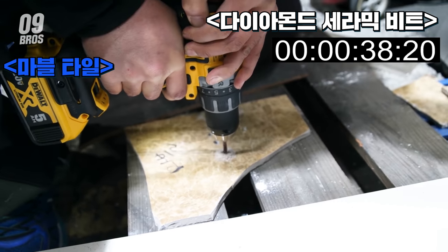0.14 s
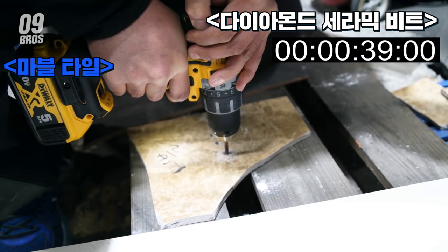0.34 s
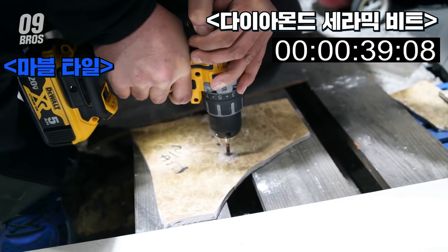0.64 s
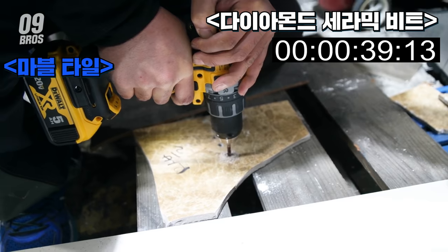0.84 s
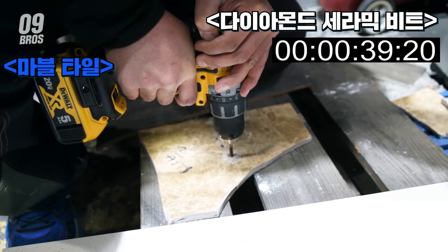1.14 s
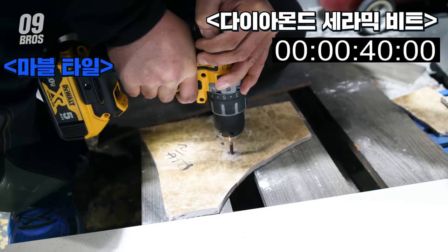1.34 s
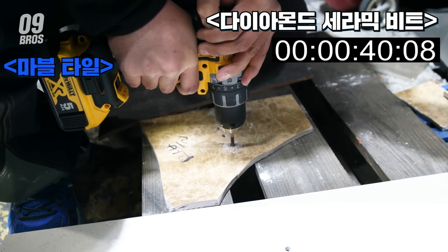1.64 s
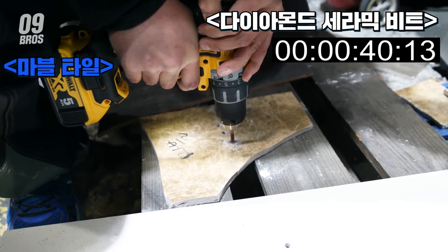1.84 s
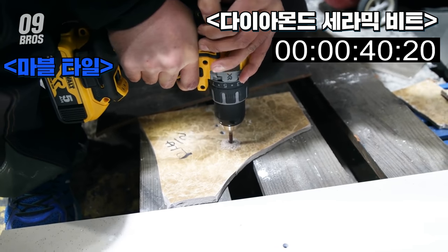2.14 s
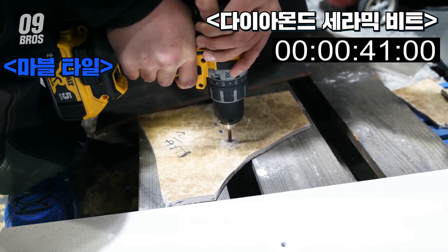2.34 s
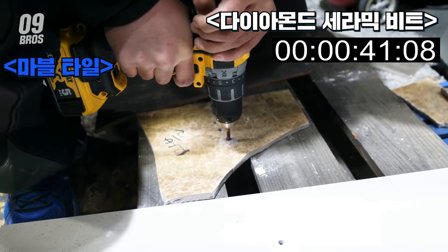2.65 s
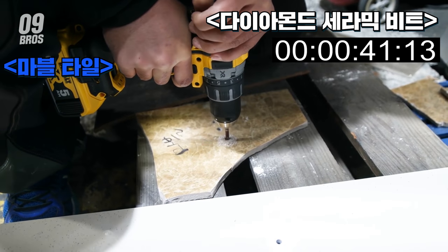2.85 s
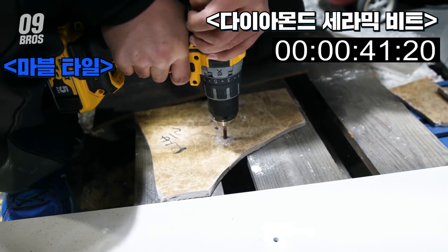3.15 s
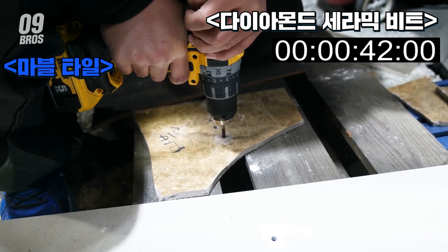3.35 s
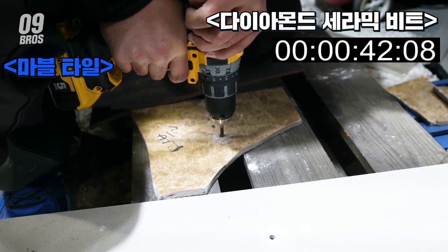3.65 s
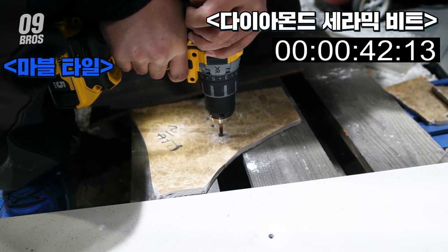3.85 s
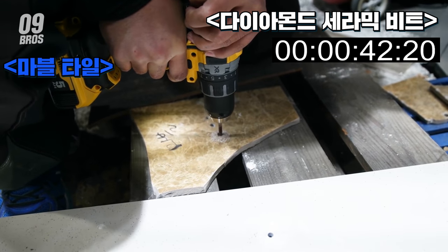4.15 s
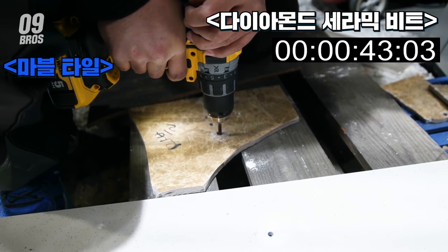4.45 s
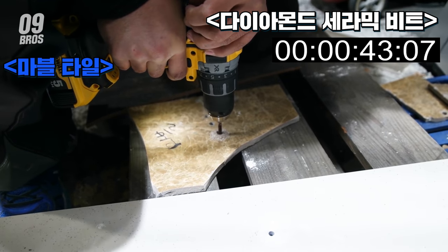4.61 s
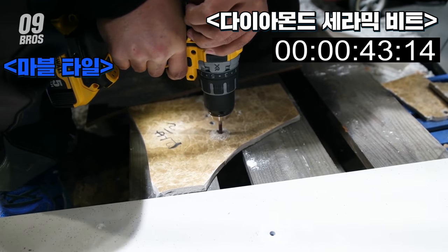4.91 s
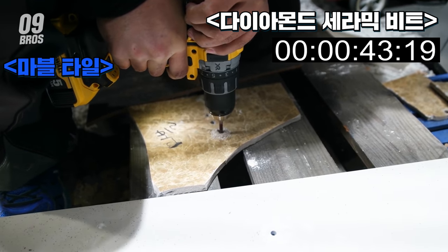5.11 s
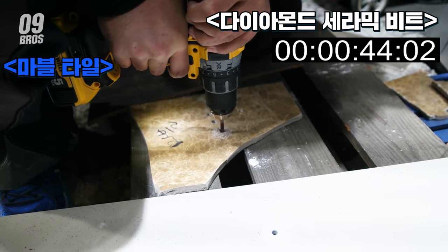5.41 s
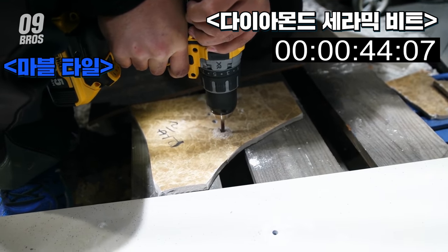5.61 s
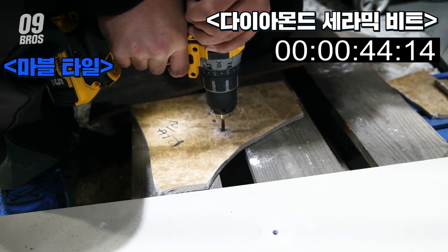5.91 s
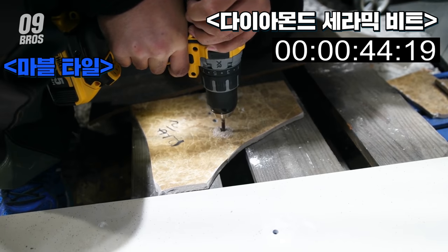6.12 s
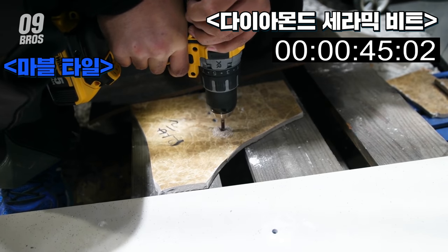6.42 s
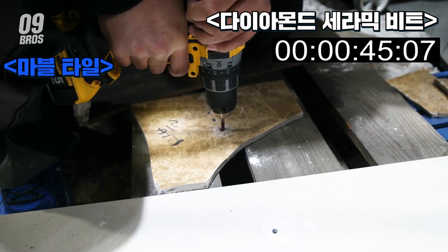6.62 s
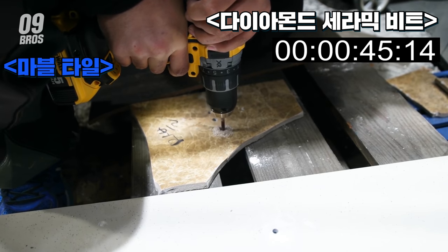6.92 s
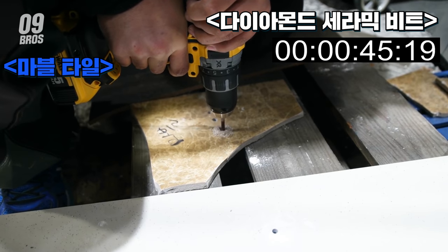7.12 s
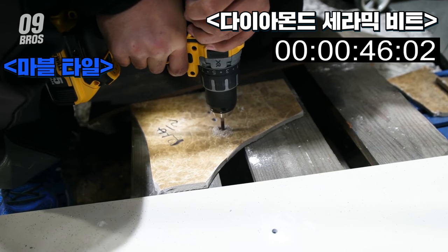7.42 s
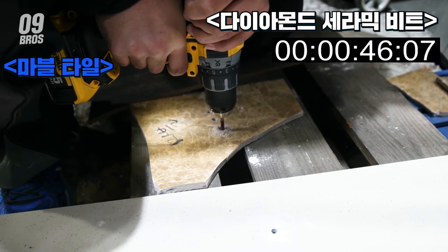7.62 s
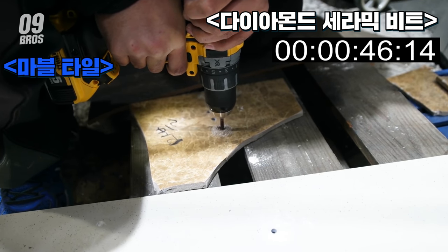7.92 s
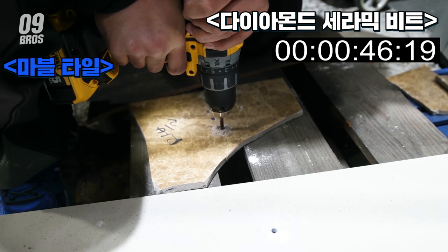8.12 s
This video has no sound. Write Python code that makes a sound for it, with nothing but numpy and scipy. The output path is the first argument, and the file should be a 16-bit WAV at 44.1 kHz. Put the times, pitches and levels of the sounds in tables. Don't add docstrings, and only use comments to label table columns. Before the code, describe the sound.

Close, constant drilling into hard tile: singing motor, harsh sandy hiss and faint bit rattle, interrupted by low wind-like buffets on the microphone.

```python
import sys
import numpy as np
from scipy import signal
from scipy.fft import rfft, irfft, next_fast_len
from scipy.io import wavfile
from scipy.ndimage import uniform_filter1d, map_coordinates

SR = 44100
rng = np.random.default_rng(int(sys.argv[2]) if len(sys.argv) > 2 else 0)


def master_out(mix):
    frames = np.transpose(np.atleast_2d(mix))
    ceiling = np.clip(frames, -1, 1)
    pcm = np.round(ceiling * 32767).astype(np.int16)
    wavfile.write(sys.argv[1], SR, pcm)


def to_linear_factor(level_db):
    exponent = np.asarray(level_db, float) / 20
    return 10 ** exponent


N = 364442

# start_s, shaft_hz, rocking_depth_hz
SHAFT_SPEED = [(0, 410.3, 1.5), (1.5, 410.4, 1.35), (2.6, 410.7, 1.35), (3.3, 410.4, 1.65),
               (3.9, 410.3, 2.15), (4.7, 410.5, 2.15), (5.3, 410.1, 1.5), (6.3, 410.2, 1.45),
               (7.5, 410.4, 1.6), (8.264, 410.1, 1.7)]
SHAFT_TURNS_PER_CHUCK_TURN, CHUCK_START_TURNS = 41.97, -.22
SHAFT_TURNS_PER_WHIRL, WHIRL_START_RAD = 43.15, .85
PLANET_PASSES_PER_SHAFT_TURN = .589
# start_s, second_grip_share, vent_lean_to_microphone, bit_pressure_db
GRIP = [(0, 0.26, 0.27, -0.5), (1, 0, 0.17, 0), (1.8, 0.02, 0.05, 0), (2.08, 0.03, 0.3, 0),
        (2.5, 0.15, 0.97, 0), (2.65, .4, 0.96, -0.5), (2.87, 1, 1, -3.5), (3.1, 0.66, 0.46, -1),
        (3.35, 0.81, 0.14, 0.1), (4.2, 1, 0.14, 0.1), (5, 1, 0, 0), (5.6, .9, 0.13, 0.2),
        (7, 0.93, 0.04, -0.1), (8.264, 0.88, 0.06, 0.2)]
# first_grip_db, second_grip_db, full_lean_gain_db
UNBALANCE_DB, THIRD_DB, POLES_DB = (-9, -3.5, -9.5), (-16, -17.5, 0.5), (-14.5, -21, 8.5)
PINION_DB, SLOTS_DB = (-6.5, -7.5, -5), (-19, -11, -1)
# start_s, level_db, echo_share, echo_angle_rad
FAN_BLADES = [(0, -8, .27, 7), (1.2, -9, .3, 4.5), (2, -10, 0.28, 5.5), (2.5, -2, 0.15, 6.5),
              (2.8, -10.5, 0.16, 7.5), (3.3, -6, .45, 5), (3.8, -9.5, .6, 3), (4.3, -14, .9, 3),
              (4.6, -16, .85, 2.5), (4.9, -18, .6, 3), (5.4, -13, .3, -2), (6, -12.5, .25, -0.5),
              (7.2, -14, .37, -0.5), (8.264, -18, .6, 1)]
# freq_hz, density_db_per_hz
HISS_FIRST_GRIP = [(20, -27), (60, -26.5), (180, -28), (308, -15.5), (369, -17.5), (440, -10), (480, -20.5),
                   (700, -16.5), (1600, -15.5), (2840, -9), (5000, -15), (9000, -17), (14900, -27.5),
                   (15700, -31)]
# freq_hz, density_db_per_hz
HISS_SECOND_GRIP = [(20, -33.5), (60, -34), (180, -34.5), (316, -21), (369, -22.5), (440, -17),
                    (480, -22.5), (1330, -20), (2600, -17), (4400, -16.5), (5100, -22), (9700, -25),
                    (15000, -33.5), (15700, -33)]
# centre_hz, width_hz, boost_db
BODY_FIRST_GRIP = [(508, 14, 12.5), (915, 10, 6), (1040, 95, 3.5), (1580, 180, 6), (1803, 78, 10.5),
                   (1885, 94, -10.5), (2320, 78, -7.5), (2770, 300, 2.5), (3450, 480, -3), (4000, 180, 4),
                   (4280, 200, -1.5), (4630, 300, 4.5), (5200, 200, 0.5), (6310, 490, -4.5),
                   (6400, 200, -2), (6680, 420, 2.5), (7640, 200, -5), (8300, 200, -0.5), (8700, 220, -10),
                   (9200, 120, -11), (10100, 100, 2), (10350, 300, 0), (10660, 200, -4), (11800, 150, -4),
                   (12400, 400, 4), (12800, 250, -2), (13350, 300, 3), (13650, 150, -2), (14100, 400, 1)]
# centre_hz, width_hz, boost_db
BODY_SECOND_GRIP = [(511, 25, 7), (900, 60, 3), (1447, 16, 6), (1650, 150, 3), (1830, 120, 4),
                    (2410, 170, -9), (2810, 120, 3.5), (3130, 120, 4.5), (3520, 150, 3), (3850, 120, 2),
                    (4340, 70, 4), (4430, 80, -3), (4950, 160, -3.5), (5510, 100, 2), (6850, 250, 1.5),
                    (7130, 220, -7), (7330, 120, 3), (7560, 150, -2), (7900, 300, 2.5), (8500, 400, -3.5),
                    (9000, 300, 1.5), (9270, 120, -2), (9650, 150, -2), (10000, 150, -2.5), (10350, 250, 3),
                    (10800, 300, -2.5), (12250, 400, 2), (12750, 300, -3), (13200, 300, 4),
                    (13950, 200, -2)]
TOP_FIRST_GRIP_DB, TOP_SECOND_GRIP_DB = 0.15, 0.5
# freq_hz, density_db_per_hz
SHANK_RATTLE = [(1400, -42), (1550, -3.5), (1680, -3.5), (1800, 2), (1900, -8), (2100, -35)]
FILL_EDGES_HZ = [4200, 5200, 6300, 7600, 9000, 10300, 11700, 13100, 14500]
FILL_CHANCE_PER_BAND = .016
FILL_DB, FILL_DB_PER_BAND = -11, -1.5
# start_s, depth_db, hold_s
GAIN_DUCKS = [(.6, 1, .4), (2.654, 6.5, 0.083), (2.78, 5, 0.35), (2.83, 1, .12), (3.05, 1.5, 0.17),
              (3.91, 2.5, 0.2), (4.42, 2, .5), (4.75, 1, 0.54), (4.88, 1.5, 0.51), (5.2, 2, .04),
              (5.455, 2.5, 0.15), (8.185, 2, .5), (8.23, 0, .5)]
GAIN_REST_DB, DUCK_ATTACK_S, RELEASE_SQUARENESS = -14, 0.004, 2.4
# full_strength_s, hold_s, level_db, stream_pace
AIR_PUFFS = [(.98, 0.11, -38, 0.5), (1.24, 0.26, -42.5, 0.3), (2.608, 0.031, -11.5, 0.2),
             (2.712, 0.48, -15, 0.78), (2.762, .03, -11.5, 0.75), (2.934, .07, -11, 0.93),
             (3.2, 0.091, -21, 0.3), (3.44, .02, -30, 0.15), (4.58, .03, -33, .2), (4.683, 0.16, -25, 0.36),
             (4.93, .27, -22.5, .55), (5.236, 0.088, -15.5, .75), (5.4, 0.19, -21, 0.45),
             (5.66, .09, -32, .25), (5.8, .05, -47, 0.05), (6.842, 0.093, -32, 0), (7.07, .22, -33, .05),
             (7.39, 0.19, -32, 0), (7.78, 0.091, -22, .15)]
SWELL_DB_PER_S, FADE_DB_PER_S = 166, 134
# freq_hz, density_db_per_hz
AIR_RUMBLE = [(15, -34), (35, -12), (60, -0.5), (100, 1.5), (160, -6), (250, -13.5), (400, -16),
              (700, -25.5), (1500, -90)]
# start_s, peak_db, pitch_hz
EDDY_PUSHES = [(2.429, -18, 78.1), (2.513, -6, 67.3), (2.597, -9, 69.6), (2.622, 8, 172), (2.644, -13, 72),
               (2.757, -1, 105), (2.774, 5, 89.5), (2.813, 5, 119), (2.917, -4, 210), (2.964, -2, 119),
               (2.986, -6, 202), (3.004, 1, 103), (3.059, 0, 138), (3.145, -5, 113), (3.417, -27, 110),
               (5.223, -10, 130), (5.268, -2, 91.5), (5.319, -9, 172), (5.344, -10, 88.8)]
BAND_MIN_HZ, BAND_RAGGED_HZ, BAND_MAX_HZ = 15060, 130, 15700


def unit(x):
    return x / np.sqrt(np.mean(x ** 2) + 1e-20)


def curves(rows):
    knot_s, *columns = np.transpose(rows)
    return [np.interp(np.arange(N) / SR, knot_s, column) for column in columns]


def wobble(rate_hz):
    knots = rng.standard_normal(int(N * rate_hz / SR) + 4)
    return map_coordinates(knots, [np.arange(N) * rate_hz / SR])


def coloured(x, spectrum, bumps=()):
    size = next_fast_len(N + 8192)
    hz = np.fft.rfftfreq(size, 1 / SR)
    knot_hz, knot_db = np.transpose(spectrum)
    db = np.interp(np.log(hz + 1), np.log(knot_hz + 1), knot_db)
    for centre_hz, width_hz, boost_db in bumps:
        db += boost_db / (1 + (2 * (hz - centre_hz) / width_hz) ** 2)
    return unit(irfft(rfft(x, size) * to_linear_factor(db), size)[:N])


def rotation():
    speed_hz, depth_hz = curves(SHAFT_SPEED)
    shaft = 2 * np.pi * np.cumsum(speed_hz) / SR
    chuck = shaft / SHAFT_TURNS_PER_CHUCK_TURN + 2 * np.pi * CHUCK_START_TURNS
    rock_hz = depth_hz * (np.cos(chuck) - .1 * np.sin(2 * chuck))
    rock_hz += .25 * wobble(25) + .5 * wobble(120)
    lead = 2 * np.pi * np.cumsum(rock_hz) / SR
    return shaft, chuck, lead


def whirl(shaft):
    return shaft / SHAFT_TURNS_PER_WHIRL + WHIRL_START_RAD


def motor(shaft, chuck, lead):
    second, lean, _ = curves(GRIP)
    tip = whirl(shaft)

    def shaded(levels_db):
        first_db, second_db, lean_db = levels_db
        return first_db + (second_db - first_db) * second + lean_db * lean + 0.39 * wobble(2.5)

    def line(order, db, flutter_db, rate_hz):
        level = np.sqrt(2) * to_linear_factor(db + flutter_db * wobble(rate_hz))
        return level * np.sin(order * (shaft + lead))

    third_db = shaded(THIRD_DB)
    dip_db = (4.8 + 2.1 * wobble(5.4)) * np.cos(tip / 2 + 1.32) ** 6
    unbalance_db = shaded(UNBALANCE_DB) + 1.15 + 0.64 * np.cos(chuck + 1.9) - dip_db
    pinion_db = shaded(PINION_DB) - 1.5 + 0.73 * np.cos(chuck + 2.6) + 0.48 * np.cos(tip + .4)
    hum = line(1, unbalance_db, 0.51, 15)
    hum += line(2, -29.5, 5.4, 9)
    hum += line(3, third_db - 2.5, 1.8, 12)
    hum += line(4, third_db - 4.5, 3.3, 12)
    hum += line(8, shaded(POLES_DB) + .1, 0.89, 40)
    hum += line(10, pinion_db, 0.83, 30)
    hum += line(16, shaded(SLOTS_DB) - 2.5, 2.7, 60)
    return hum


def fan(shaft, lead):
    db, share, angle_rad = curves(FAN_BLADES)
    late_lead = np.roll(lead, round(.005 * SR))
    both = np.exp(23j * lead) + share * np.exp(1j * (23 * late_lead + angle_rad))
    both /= np.sqrt(uniform_filter1d(abs(both) ** 2, size=9000))
    return np.sqrt(2) * to_linear_factor(db + 1.5 * wobble(45)) * np.imag(both * np.exp(23j * shaft))


def grinding(shaft, chuck):
    second, _, pressure_db = curves(GRIP)
    z = signal.stft(rng.standard_normal((2, N)), nperseg=512)[2]
    patches = uniform_filter1d(rng.standard_normal(z.shape[1:]), size=8, axis=0)
    patches = uniform_filter1d(patches, size=10, axis=1)
    grit = signal.istft(z * to_linear_factor(0.54 * unit(patches)), nperseg=512)[1][:, :N]
    tip = whirl(shaft)
    pulse_db = 0.2 * np.cos(2 * tip + 0.2) + 0.19 * np.cos(tip) + 0.17 * np.cos(chuck + .6)
    pulse_db += 0.17 * np.cos(PLANET_PASSES_PER_SHAFT_TURN * shaft) + 0.23 * np.cos(shaft)
    pulse_db += 0.17 * wobble(12) + 0.46 * wobble(160)
    grit = grit * to_linear_factor(pulse_db)
    blend_rad = np.clip(second, 0, 1) * np.pi / 2
    hiss = np.cos(blend_rad) * coloured(grit[0], HISS_FIRST_GRIP, BODY_FIRST_GRIP)
    hiss += np.sin(blend_rad) * coloured(grit[1], HISS_SECOND_GRIP, BODY_SECOND_GRIP)
    top = hiss - uniform_filter1d(hiss, size=5)
    top_db = TOP_FIRST_GRIP_DB + (TOP_SECOND_GRIP_DB - TOP_FIRST_GRIP_DB) * second
    return to_linear_factor(2.0 + pressure_db) * (hiss + (to_linear_factor(top_db) - 1) * top)


def rattle(shaft):
    tip = whirl(shaft)
    knock = to_linear_factor(1.8 * np.cos(tip) + 4.8 * np.cos(2 * tip + 0.38) + 0.37 * wobble(14))
    return to_linear_factor(-13.0) * unit(knock * coloured(rng.standard_normal(N), SHANK_RATTLE))


def fills():
    side = np.zeros(N + 4096)
    hz = np.fft.rfftfreq(2048, 1 / SR)
    fade = np.sin(np.pi / 2 * np.sin(np.pi * np.arange(2048) / 2048) ** 2)
    chances = rng.random((N // 1024, len(FILL_EDGES_HZ) - 1))
    picked = np.argwhere(chances < FILL_CHANCE_PER_BAND)
    for (frame, k), noise in zip(picked, rng.standard_normal((len(picked), 2048))):
        in_band = (hz > FILL_EDGES_HZ[k]) * (hz < FILL_EDGES_HZ[k + 1])
        band = irfft(rfft(noise) * in_band)
        side[777 + frame * 1024:][:2048] += to_linear_factor(FILL_DB_PER_BAND * k) * fade * unit(band)
    return to_linear_factor(FILL_DB) * side[:N] * [[1], [-1]]


def gain():
    t = np.arange(N) / SR
    db = np.full(N, float(GAIN_REST_DB))
    for start_s, depth_db, hold_s in GAIN_DUCKS:
        since_s = np.clip(t - start_s, 0, None)
        release = np.exp(-(since_s / abs(hold_s)) ** RELEASE_SQUARENESS)
        db -= depth_db * np.clip(since_s / DUCK_ATTACK_S, 0, 1) * release
    return db


def draught():
    t = np.arange(N) / SR
    power = []
    for full_s, hold_s, level_db, _ in AIR_PUFFS:
        swell_db = SWELL_DB_PER_S * np.clip(full_s - t, 0, None)
        fade_db = FADE_DB_PER_S * np.clip(t - full_s - hold_s, 0, None)
        power.append(to_linear_factor(level_db - swell_db - fade_db) ** 2 + 1e-12)
    power = np.array(power)
    db = 10 * np.log10(power.sum(0))
    pace = np.clip(np.transpose(AIR_PUFFS)[3] @ power / power.sum(0), 0, 1)
    eddies = rng.standard_normal(N) * to_linear_factor(0.8 * wobble(22) + 1.4 * wobble(45) + 2.2 * wobble(110))
    dull = coloured(eddies, AIR_RUMBLE, [(292, 300, -9), (52, 49, 7.0)])
    bright = coloured(eddies, AIR_RUMBLE, [(224, 240, 8.5), (50, 92, -16.5)])
    air = pace * bright + (1 - pace) * dull
    air /= np.sqrt(abs(uniform_filter1d(air ** 2, size=5000)) + 0.039)
    stream = to_linear_factor(db - 0.24) * air / (1 + np.exp(-(db + 43) / 1.7))
    return (stream + pushes()) / to_linear_factor(gain())


def pushes():
    out = np.zeros(N + SR)
    t = np.arange(SR // 20) / SR
    for start_s, peak_db, pitch_hz in EDDY_PUSHES:
        life = np.clip(t * pitch_hz / 1.56, 0, 1)
        push = np.sin(np.pi * life) * np.sin(2 * np.pi * pitch_hz * t)
        out[round(start_s * SR):][:len(t)] -= to_linear_factor(peak_db - 5.5) * push
    return out[:N]


def scene():
    shaft, chuck, lead = rotation()
    mono = motor(shaft, chuck, lead) + fan(shaft, lead)
    mono += grinding(shaft, chuck) + rattle(shaft) + draught()
    return np.array([mono, mono])


def top_cut(x):
    return signal.sosfilt(signal.butter(12, 15700, fs=SR, output="sos"), x)


def record(dry):
    x = (dry + fills()) * to_linear_factor(gain())
    x = x / (1 + abs(x / 1.01) ** 8) ** (1 / 8)
    hz, t, z = signal.stft(x, SR, nperseg=2048)
    ragged_hz = BAND_RAGGED_HZ * (.5 + np.clip(t / 3, 0, 1)) * rng.exponential(size=len(t))
    edge_hz = np.minimum(BAND_MIN_HZ + ragged_hz, BAND_MAX_HZ)
    x = signal.istft(z * (hz[:, None] < edge_hz), SR, nperseg=2048)[1][:, :N]
    return top_cut(x)


dry = scene()
out = record(dry)
master_out(out)
```